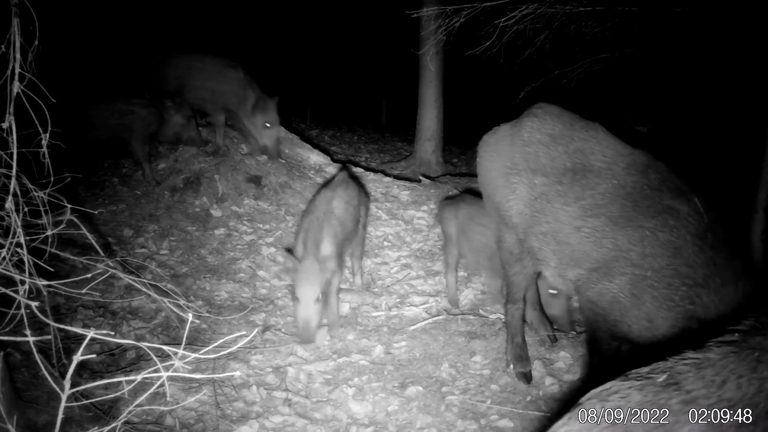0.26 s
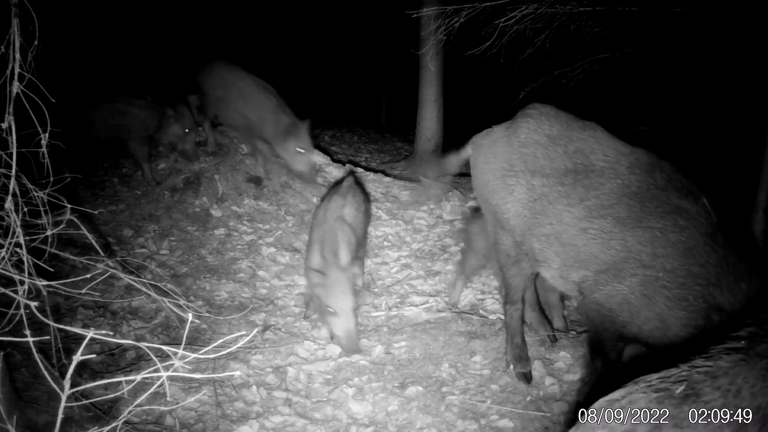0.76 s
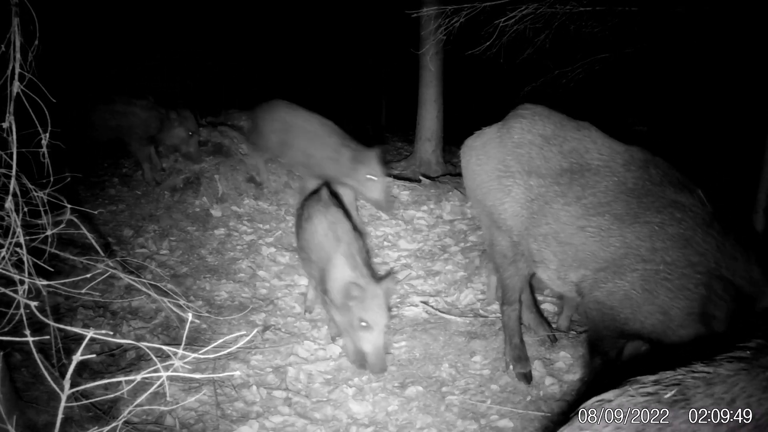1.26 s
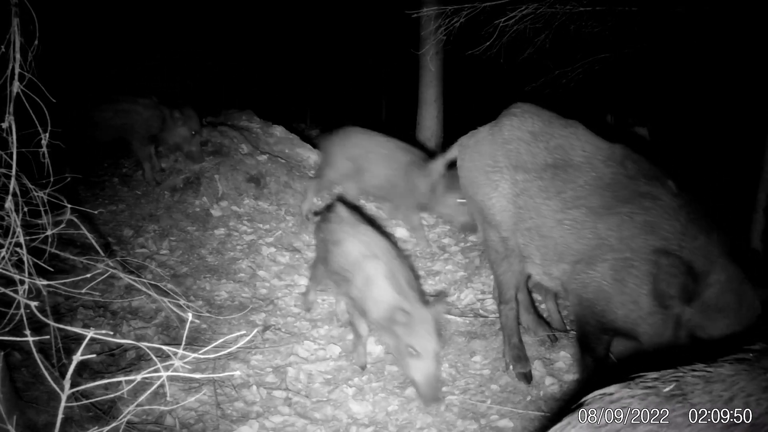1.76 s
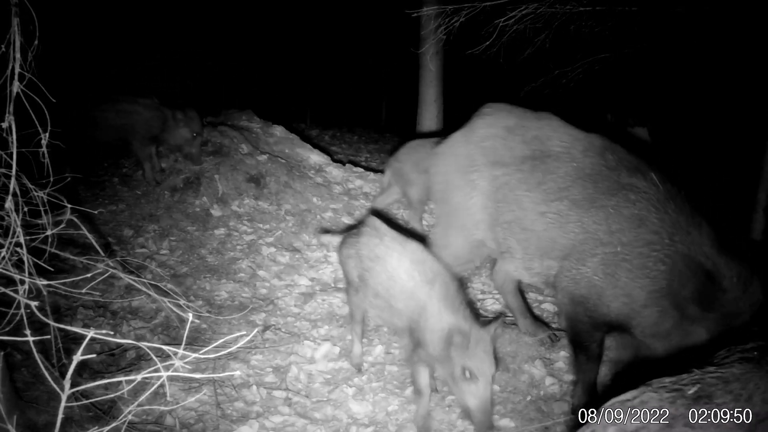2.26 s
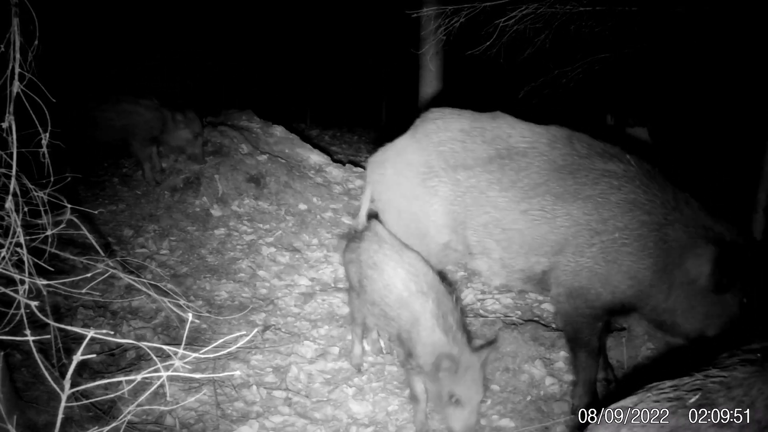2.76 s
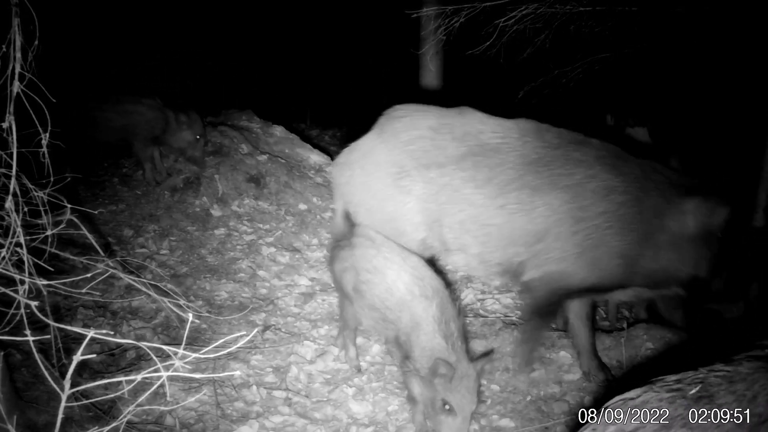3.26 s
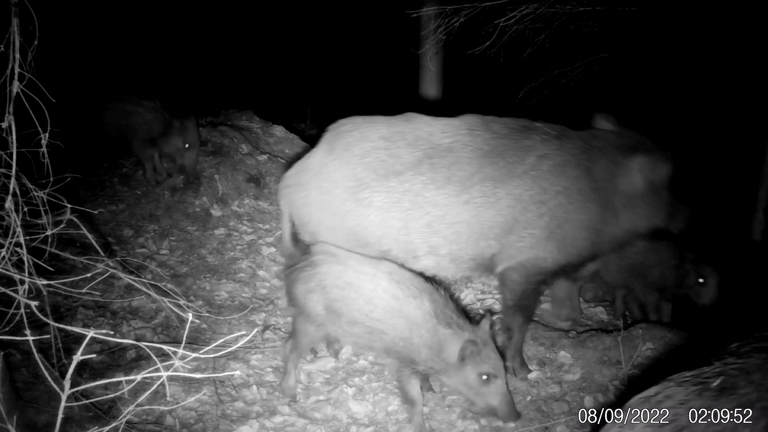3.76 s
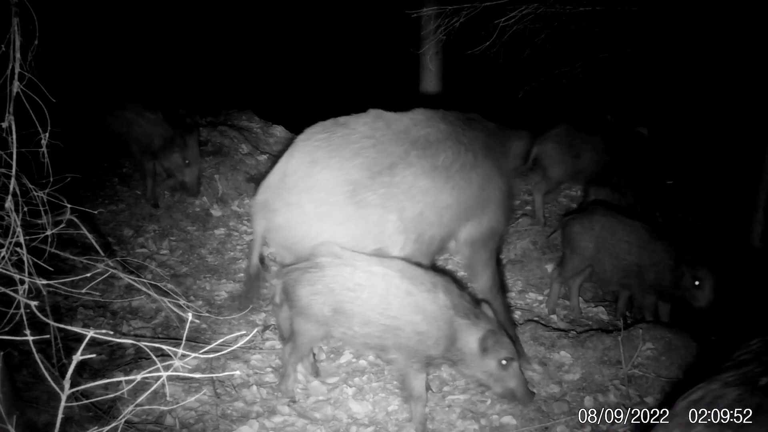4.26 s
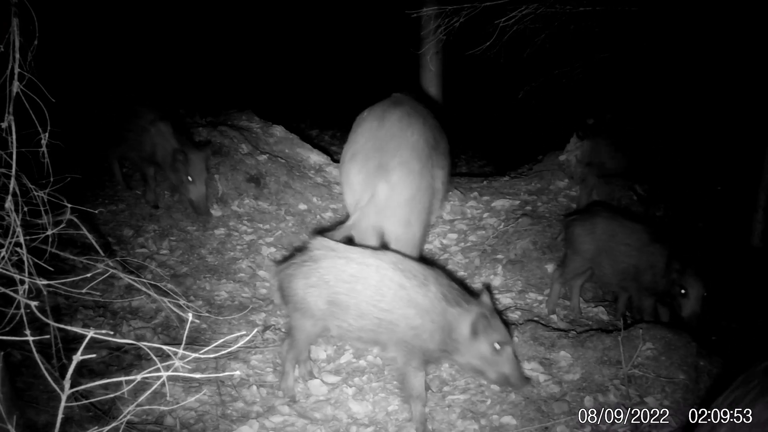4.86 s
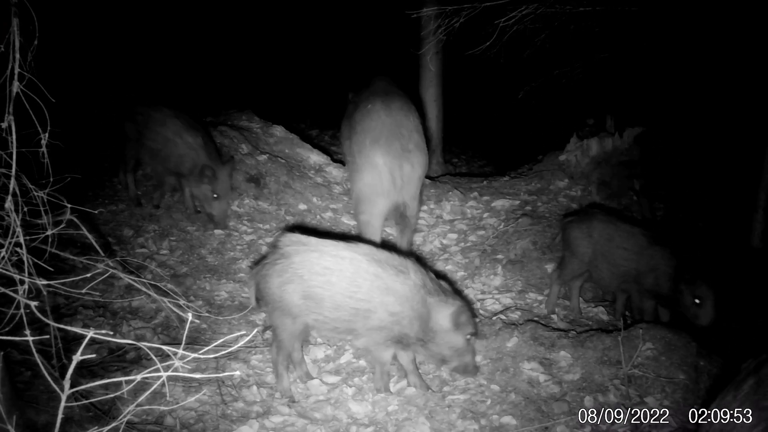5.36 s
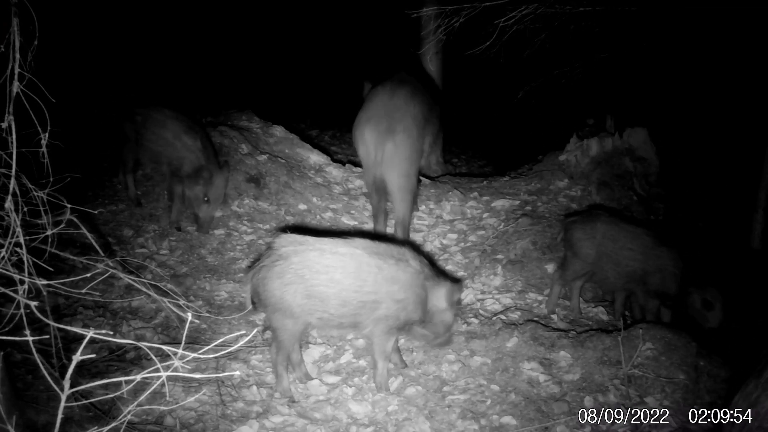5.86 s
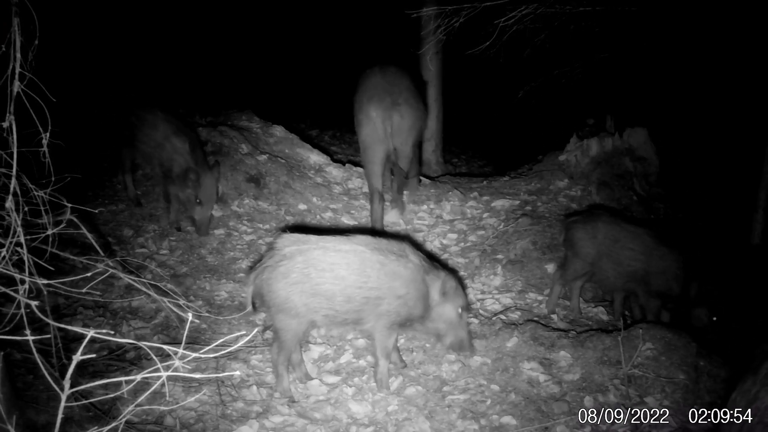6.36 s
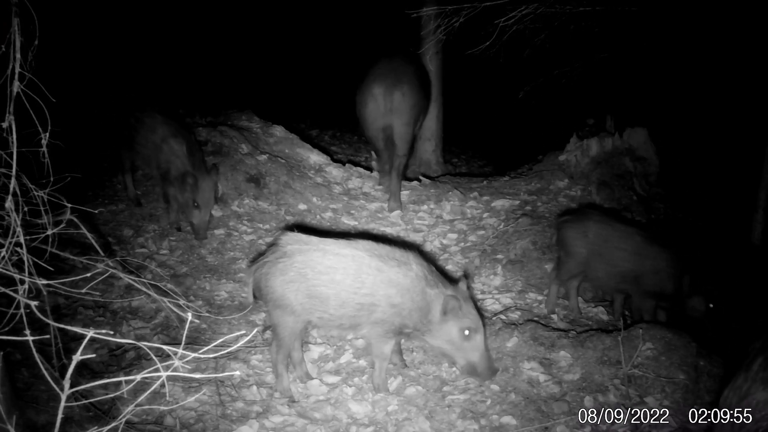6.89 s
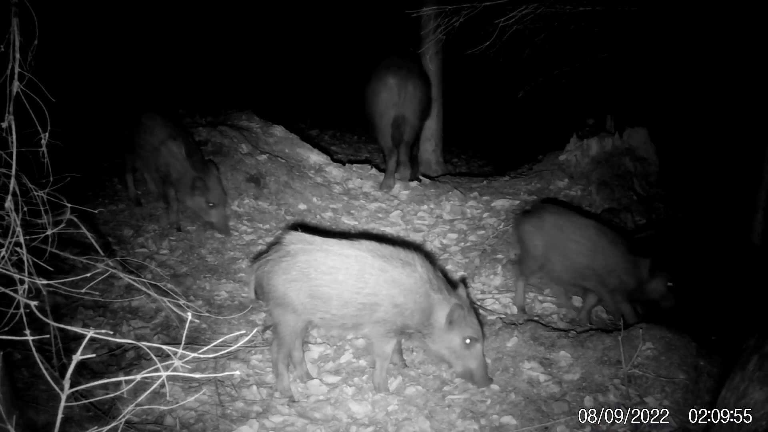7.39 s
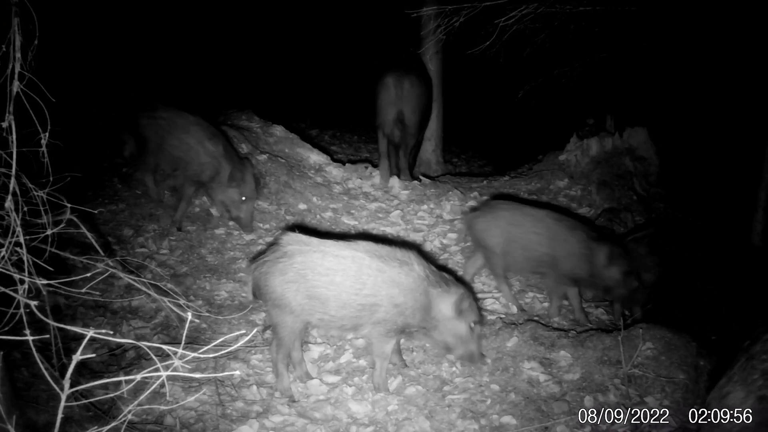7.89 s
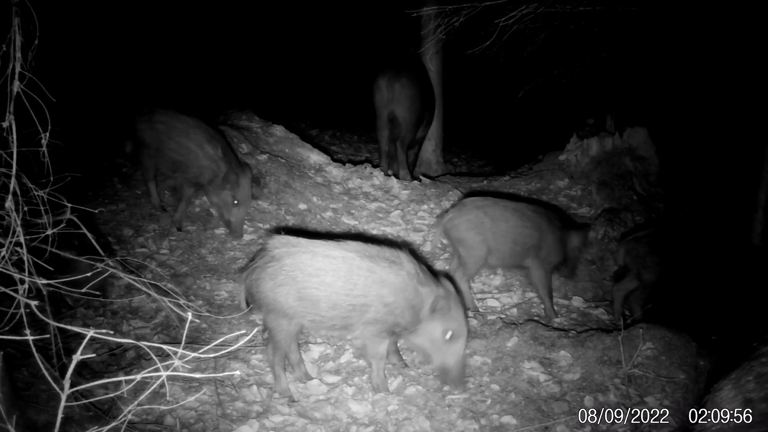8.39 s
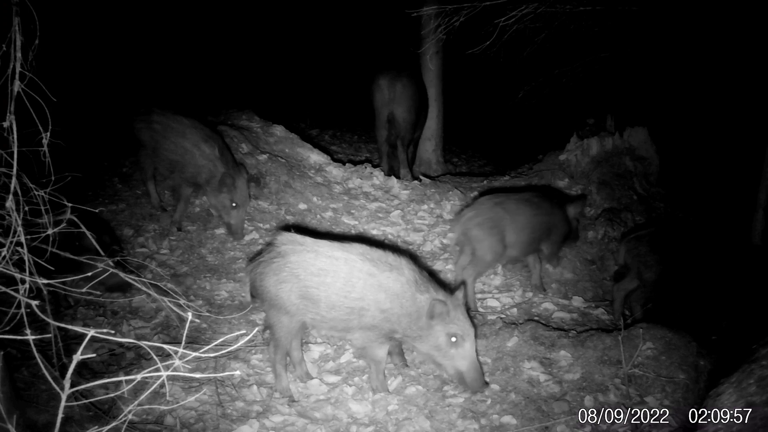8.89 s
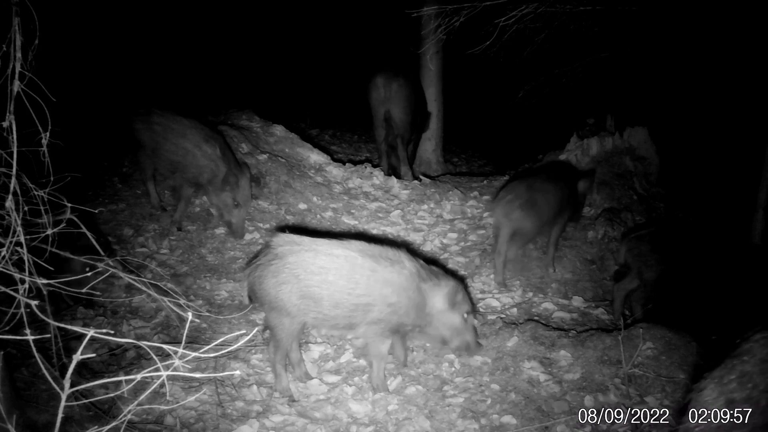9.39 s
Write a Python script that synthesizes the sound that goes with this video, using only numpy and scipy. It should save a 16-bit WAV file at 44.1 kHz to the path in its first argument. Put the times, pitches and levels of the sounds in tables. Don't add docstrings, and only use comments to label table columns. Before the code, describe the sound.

Close, hissy night woodland: low boar grunts and creaks, nasal squeaks and a snort, over constant leaf rustling, small ticks and sharp twig cracks.

```python
import sys
import numpy as np
from scipy import signal
from scipy.fft import rfft, irfft
from scipy.io import wavfile
from scipy.ndimage import uniform_filter1d

SR = 44100
rng = np.random.default_rng(int(sys.argv[2]) if len(sys.argv) > 2 else 0)


def decibels_to_gain(level_db):
    exponent = np.asarray(level_db, float) / 20
    return 10 ** exponent


def store_wav(level_fs):
    pcm = np.round(np.clip(np.atleast_2d(level_fs), -1, 1) * 32767)
    wavfile.write(sys.argv[1], SR, pcm.T.astype(np.int16))


N = 425124


def unit(x):
    return x / np.sqrt(np.mean(x ** 2))


def curve(points, at):
    hz, db = np.transpose(points)
    return decibels_to_gain(np.interp(np.log(np.maximum(at, 1)), np.log(hz), db))


def colour(x, points, lo=0, hi=SR):
    hz = np.fft.rfftfreq(N, 1 / SR)
    low_edge = 1 / np.sqrt(1 + (lo / np.maximum(hz, 1)) ** 20)
    high_edge = 1 / np.sqrt(1 + (hz / hi) ** 20)
    return unit(irfft(rfft(x) * curve(points, hz) * low_edge * high_edge, N))


def walk(rate):
    k = int(SR / rate)
    steps = np.repeat(rng.standard_normal(N // k + 1), k)
    return unit(uniform_filter1d(uniform_filter1d(steps, k), k)[:N])


def level_over_time(table):
    s, db = np.transpose(table)
    return np.interp(np.arange(N) / SR, s, db)


def add(out, s, sound):
    i = int(s * SR)
    out[i:i + len(sound)] += sound[:N - i]


def swells(rows):
    power, t = np.zeros(N), np.arange(N) / SR
    for s, db, fall_s in rows:
        distance = np.maximum(s - t, (t - s) / 1.112)
        power += decibels_to_gain(db - 10 * distance / fall_s) ** 2
    return np.sqrt(power)


def throat_pulse(throat, level_db, open_db, detune, scatter_db):
    t = np.arange(SR // 16)[:, None] / SR
    hz, db, t60 = np.transpose(throat)
    level_chance, pitch_chance = rng.standard_normal((2, len(hz)))
    opening_db = max(open_db, 0)
    treble_db = open_db * np.clip(np.log2(hz / 1400), 0, 1)
    boom_db = -0.45 * np.where(hz < 700, open_db, opening_db * (hz < 1200))
    gain = decibels_to_gain(db + treble_db + boom_db + scatter_db * level_chance)
    pitch = hz * (1 + detune * pitch_chance + 0.014 * opening_db * (hz < 2000))
    decay = decibels_to_gain(-60 * t / t60 * (1 + opening_db / 12))
    noise = rng.standard_normal((len(t), len(hz)))
    air = 1 + decibels_to_gain(-12) * uniform_filter1d(noise, size=40, axis=0) * np.sqrt(40)
    soft_start = 1 - np.exp(-t / .0004)
    ring = np.sin(2 * np.pi * pitch * t) * decay * air * soft_start
    return -decibels_to_gain(level_db + 1.5) * (gain * ring).sum(axis=1)


def grunts(table, throat, detune=.015, scatter_db=1.5):
    out = np.zeros(N)
    for first, last, count, level_db, open_db in table:
        for s in np.linspace(first, last, round(count)):
            add(out, s, throat_pulse(throat, level_db, open_db, detune, scatter_db))
    return signal.sosfilt(signal.butter(4, [130, 4600], "band", fs=SR, output="sos"), out)


def popping_sow():
    pops = [
        (.1618, .1618, 1, -46, -10),
        (.1645, .1645, 1, -34.5, -11),
        (.4275, .4275, 1, -38.5, -16),
        (1.7096, 1.7096, 1, -50, -4),
        (2.212, 2.212, 1, -39, -9),
        (2.2418, 2.2418, 1, -46, -3),
        (2.2455, 2.2455, 1, -32, 0),
    ]
    throat = [(335, -8, .035), (620, -14, .02), (1240, 0, .045), (1540, -11, .03), (1750, -15, .03),
              (2000, -16, .03), (2630, -19, .03), (3045, -17, .025), (3650, -4, .016)]
    return grunts(pops, throat)


def barking_sow():
    bark = [
        (1.3826, 1.3826, 1, -34, 0),
    ]
    bark_throat = [(271, -4, .045), (641, -13, .05), (1017, -9, .045), (1196, -5, .045), (1765, -3, .06),
                   (2269, -12, .045), (2482, -1, .04), (2737, -7, .035), (3299, -5, .035),
                   (3890, -17, .025)]
    second_bark = [
        (1.7412, 1.7412, 1, -34, 0),
    ]
    second_throat = [(275, -4, .045), (675, -8, .045), (1040, -1, .05), (1221, 0, .05), (1789, -10, .05),
                     (2472, -6, .045), (2754, -16, .035), (3305, -3, .045), (3860, -18, .025)]
    return grunts(bark, bark_throat, .004, .7) + grunts(second_bark, second_throat, .004, .7)


def creaking_sow():
    creaks = [
        (.0823, .1167, 2, -48, 13),
        (1.4976, 1.4976, 1, -38, 6),
        (1.531, 1.5974, 3, -35.5, 0),
        (1.6318, 1.6318, 1, -44, -1),
        (1.7829, 1.9266, 5, -50, 14),
    ]
    creak_throat = [(190, -7, .04), (600, -17, .02), (1140, 0, .026), (1350, -7, .015), (1510, -4, .03),
                    (1950, -10, .022), (2580, -7, .01), (3270, -4, .022), (3700, -17, .018)]
    gapes = [
        (3.6093, 3.6093, 1, -52, 4),
        (3.6815, 3.7185, 2, -57, 2),
        (4.829, 4.829, 1, -45, 6),
        (4.8637, 4.8637, 1, -40, 1),
        (4.8965, 4.9283, 2, -42, 0),
    ]
    gape_throat = [(1290, -3, .03), (1720, -6, .022), (1860, -7, .022), (2900, 0, .016), (3250, 2, .02),
                   (3650, 0, .014)]
    return grunts(creaks, creak_throat) + grunts(gapes, gape_throat, .02, 2)


def rasping_sow():
    rasps = [(1.864, 1.904, 3, -52, 3), (2.0478, 2.0997, 3, -45, -6), (2.1197, 2.1651, 4, -46, -3),
             (2.3277, 2.3901, 4, -51, 4), (2.411, 2.4729, 3, -47, -3), (2.4929, 2.535, 3, -50, -4),
             (2.381, 2.431, 2, -51, -2), (3.0655, 3.1039, 3, -61, 9), (3.515, 3.5604, 3, -61, 9),
             (4.2942, 4.2942, 1, -50, 3), (4.3561, 4.379, 2, -52, 7)]
    throat = [(290.6, 1, 0.0218), (614, 0, 0.016), (1170, 4, 0.024), (1820, -2, 0.022), (2277, 1, 0.018),
              (2800, -1, 0.018)]
    # (time [s], peak level [dB], centre frequency [Hz])
    nose_rings = [
        (2.3496, -41, 6000),
        (2.3695, -39, 6100),
        (2.3905, -33, 6150),
        (2.4112, -34, 6150),
        (2.4314, -37, 6200),
        (2.4513, -42, 6200),
        (2.4723, -35, 6200),
        (2.491, -35, 6250),
    ]
    return grunts(rasps, throat, detune=.06, scatter_db=2.5) + snaps(nose_rings, .09, -40)


def chest(creak_hz=31, depth=0.38):
    # (frequency [Hz], level [dB])
    chest_colour = [(30, -17), (70, -3), (140, -2), (280, 0), (400, -3), (600, -10), (1000, -28),
                    (4000, -48)]
    # (peak time [s], level [dB], time to fall 10 dB [s])
    rumbles = [(.12, -65, 0.4), (.43, -57.5, 0.25), (.9, -61.5, 0.1536), (1.55, -62.5, 0.1543),
               (1.9, -57, 0.14), (2.12, -60.5, 0.13), (2.25, -63, 0.06), (2.47, -56, 0.1047),
               (2.69, -63.5, 0.09), (3.05, -61, 0.19), (3.55, -64.5, 0.41), (4.42, -60.5, 0.13),
               (4.9, -66.5, 0.1), (5.85, -68, .3), (6.3, -67.5, 0.25), (8.3, -67, .25), (8.85, -63, 0.23)]
    phase = np.cumsum(creak_hz * (1 + .15 * walk(5.4))) / SR % 1
    throb = 1 - depth + depth * 3 * np.exp(-phase / 0.133)
    breath = unit(throb * colour(rng.standard_normal(N), chest_colour))
    herd = decibels_to_gain(-73)
    return decibels_to_gain(2.5) * np.hypot(swells(rumbles), herd) * breath


def slide(s, length, start_hz, end_hz):
    return [(s, start_hz), (s + .55 * length, end_hz), (s + length, end_hz)]


def glide(path, db):
    s, hz = np.transpose(path)
    t = np.arange(s[0], s[-1], 1 / SR)
    pitch = uniform_filter1d(np.interp(t, s, hz), size=SR // 100)
    phase = 2 * np.pi * np.cumsum(pitch) / SR
    flutter = decibels_to_gain(45 * uniform_filter1d(rng.standard_normal(len(t)), size=SR // 150))
    ends = np.clip(np.minimum(t - s[0], s[-1] - t) / .005, 0, 1)
    arch = decibels_to_gain(db - 4 * np.linspace(-1, 1, len(t)) ** 2)
    return s[0], phase, pitch, np.sqrt(2) * ends * flutter * arch


def whistling_snout():
    # (start [s], length [s], from pitch [Hz], to pitch [Hz], level [dB])
    slides = [
        (0.104, 0.054, 1657, 2080, -51),
        (0.268, 0.0247, 2247, 2302, -55),
        (0.459, 0.0307, 640, 790, -57),
        (0.753, 0.066, 1603, 2132, -57),
        (5.091, 0.0486, 1586, 2029, -56.5),
        (5.58, 0.0707, 1932, 2054, -64.5),
        (7.378, 0.013, 957, 931, -55),
        (8.72, 0.061, 2950, 2760, -64),
    ]
    # (third overtone [dB], level [dB], path of (time [s], pitch [Hz]))
    warbles = [
        (4, -54.5, [(.296, 1490), (.32, 1910), (.338, 2015), (.37, 1865), (.4, 1975), (.43, 1955), (.46, 1810), (.485, 2010), (.505, 2030)]),
        (7, -62, [(5.438, 1400), (5.455, 1830), (5.47, 2000), (5.49, 2020)]),
        (-20, -52, [(6.885, 1882), (6.9, 1918), (6.935, 1691), (6.965, 2037), (6.99, 2155)]),
        (-4, -58, [(7.13, 1529), (7.164, 1789), (7.225, 1490)]),
        (-2, -57, [(7.245, 1520), (7.28, 1892), (7.335, 2140), (7.36, 1720), (7.41, 1588)]),
        (-26, -62, [(7.445, 1580), (7.463, 1680), (7.535, 1476)]),
    ]
    calls = []
    for s, length, start_hz, end_hz, db in slides:
        octaves_off = np.log2(3 * end_hz / 6000)
        third_db = 2 - min(10 * (octaves_off / .2) ** 2, 20)
        calls.append((third_db, db, slide(s, length, start_hz, end_hz)))
    out = np.zeros(N)
    for third_db, db, path in calls + warbles:
        s, phase, pitch, env = glide(path, db)
        second = decibels_to_gain(-17) * np.sin(2 * phase)
        tiring_db = 3 * np.linspace(1, -1, len(env))
        third = decibels_to_gain(third_db + tiring_db) * np.sin(3 * phase)
        add(out, s, env * (np.sin(phase) + second + third))
    return out


def waver(count):
    wander = uniform_filter1d(rng.standard_normal(count), size=SR // 40)
    return decibels_to_gain(2 * np.sqrt(SR / 40) * wander)


def squeaking_snout():
    # (share of the resonance frequency [ratio], level [dB])
    squeak_colour = [(.25, -20), (.55, -13), (.7, -7), (.85, 0), (1, 4), (1.2, 1), (1.45, -8), (1.7, -12),
                     (1.95, -7), (2.15, -26), (2.6, -40)]
    # (time [s], frequency [Hz])
    nostril = [(5.7, 6100), (5.9, 5600), (6.1, 5700), (7.1, 4700), (7.3, 5200), (7.6, 4600), (8.33, 3900),
               (8.46, 4700), (9.27, 5000), (9.5, 4900)]
    # (start [s], length [s], rim pitch [Hz], turn pitch [Hz], level [dB])
    sniffs = [
        (5.695, .085, 1230, 955, -60),
        (5.93, .12, 1350, 800, -71),
        (5.98, .07, 1230, 955, -65),
        (8.33, .07, 1150, 1340, -67),
        (8.4, .045, 1180, 1215, -65),
        (8.77, .035, 1060, 1120, -64),
        (9.272, .063, 1200, 1620, -61),
        (9.33, .04, 1230, 990, -59),
        (9.455, .085, 1400, 1110, -59),
        (9.515, .058, 970, 1290, -58),
    ]
    # (start [s], length [s], from pitch [Hz], to pitch [Hz], level [dB])
    slides = [
        (5.9, .04, 950, 1250, -66),
        (9.36, .06, 1130, 1400, -64),
        (9.4, .025, 1230, 1270, -63),
    ]
    # (level [dB], path of (time [s], pitch [Hz]))
    warbles = [
        (-63, [(6.1, 1220), (6.12, 1060), (6.135, 1025), (6.155, 1090), (6.17, 1095), (6.19, 1215), (6.235, 1245)]),
        (-63, [(7.13, 1240), (7.16, 1335), (7.195, 1375), (7.215, 1650), (7.235, 1950)]),
        (-60, [(7.285, 1400), (7.32, 1265), (7.35, 1330), (7.372, 1405), (7.395, 1260), (7.415, 1050), (7.435, 1190), (7.455, 1420)]),
        (-61, [(7.44, 1290), (7.465, 1860), (7.495, 1900), (7.514, 1690)]),
        (-62, [(7.515, 1350), (7.55, 1150), (7.568, 1240), (7.62, 1240), (7.647, 1355), (7.665, 1300), (7.69, 1320)]),
        (-63, [(7.685, 1310), (7.71, 1400), (7.74, 1340), (7.795, 1065), (7.82, 1110), (7.845, 1250), (7.86, 1250)]),
        (-64, [(8.46, 1330), (8.52, 1260), (8.57, 1360), (8.63, 1240), (8.69, 1310), (8.71, 1230), (8.725, 950)]),
    ]
    calls = []
    for s, length, rim, turn, db in sniffs:
        path = [(s + length * (u + 1) / 2, turn + (rim - turn) * abs(u) ** 1.4)
                for u in np.linspace(-1, 1, num=9)]
        calls.append((db, path))
    for s, length, start_hz, end_hz, db in slides:
        calls.append((db, slide(s, length, start_hz, end_hz)))
    colour_hz = [(1000 * share, db) for share, db in squeak_colour]
    out = np.zeros(N)
    for db, path in calls + warbles:
        s, phase, pitch, env = glide(path, db)
        resonance_hz = np.interp(s, *np.transpose(nostril))
        buzz = np.zeros(len(env))
        for k in range(1, 10):
            gain = curve(colour_hz, 1000 * k * pitch / resonance_hz)
            buzz += gain * waver(len(env)) * np.sin(k * phase + k * k)
        add(out, s, env * buzz)
    return out


def snort():
    # (time [s], level [dB])
    breath = [
        (5.09, -64),
        (5.16, -46.5),
        (5.23, -40),
        (5.3, -44),
        (5.36, -48.5),
        (5.43, -64),
    ]
    # (frequency [Hz], level [dB])
    snort_colour = [(700, -16), (2000, -6.5), (3500, -8), (4800, -8.5), (6200, -3.5), (8300, 0),
                    (10500, -14.5), (12500, -25)]
    return decibels_to_gain(level_over_time(breath) + walk(27)) * colour(rng.standard_normal(N), snort_colour)


def crackle(per_s, spread_db, ring_s):
    sizes = decibels_to_gain(spread_db * np.minimum(rng.exponential(size=N), 4))
    hits = (rng.random(N) < per_s / SR) * sizes
    return unit(signal.lfilter([1], [1, -np.exp(-1 / (ring_s * SR))], hits))


def leaves():
    # (frequency [Hz], level [dB])
    leaf_colour = [(290, -35.5), (500, -1.5), (742, 5.5), (806, 4.5), (874, 3.5), (2060, 3.5), (4370, -8),
                   (5740, -0.5), (7960, -10.5), (10000, -21), (13000, -29)]
    # (time [s], level [dB])
    stirring = [(0, -59), (.7, -59), (1.2, -61.5), (1.55, -59), (2.4, -59), (2.85, -65), (4.1, -60),
                (5.2, -58), (5.6, -63), (6.3, -67.5), (7.3, -61), (8, -64.5), (9.64, -58.5)]
    # (peak time [s], level [dB], time to fall 10 dB [s],
    # crisp top [dB])
    shuffles = [(0, -50, 0.0853, -4), (.1, -48.5, 0.12, -5), (.21, -48.5, 0.14, -6), (.4, -53.5, 0.32, -8),
                (1.15, -54, 0.08, -6), (1.49, -53.5, .04, -3), (.48, -55, .02, -1), (1.88, -55.5, 0.11, -2),
                (2.12, -52.5, 0.12, -1), (2.95, -55, 0.03, -7), (3.14, -49.5, 0.1, -2),
                (3.36, -52.5, 0.06, -4), (3.46, -54.5, 0.1, -5), (3.57, -56, 0.07, -3),
                (3.89, -54, 0.08, -6.5), (4.05, -55.5, 0.18, 3), (4.45, -52.5, 0.32, 3.5),
                (4.56, -54, .03, 3), (4.68, -57, .06, -3), (4.97, -53.5, 0.28, -7),
                (5.64, -48.5, 0.07, -4.5), (5.85, -51.5, 0.073, -5), (6.18, -57.5, 0.1, -5.5),
                (6.41, -57, 0.06, -5), (6.76, -56, 0.2, -3), (7.4, -55, 0.33, -2.5), (7.64, -52.5, .04, 1),
                (7.72, -54, 0.16, -5), (8.22, -55, 0.3, -7), (8.332, -47, 0.03, -4), (8.48, -52, 0.085, -8),
                (8.76, -50.5, .08, -6), (9.005, -49, 0.09, -11), (9.182, -49.5, 0.05, 0),
                (9.29, -55, 0.06, -9),
                (5.47, -57, .1, 3),
        (7.9, -59, 0.1, 1),
        (9.49, -54, .12, 0),
    ]
    rows = shuffles
    stir = decibels_to_gain(level_over_time(stirring))
    near = swells([(s, db, fall_s) for s, db, fall_s, crisp_db in rows])
    crisp = swells([(s, db + crisp_db, fall_s) for s, db, fall_s, crisp_db in rows])
    cracks = .5 + .3 * crackle(600, 3.6, .0012) + .2 * crackle(40, 1.5, .01)
    grain = cracks * rng.standard_normal(N)
    core = decibels_to_gain(1.2 * walk(25)) * colour(grain, leaf_colour, 4000, 7100)
    top = decibels_to_gain(2.2 * walk(14) - 1.5) * colour(grain, leaf_colour, 7300)
    smoother = grain + .7 * rng.standard_normal(N)
    body = decibels_to_gain(-1.5) * colour(smoother, leaf_colour, 450, 4000)
    core_level = np.hypot(stir, near)
    top_level = np.hypot(decibels_to_gain(-20) * stir, crisp)
    body_level = np.hypot(decibels_to_gain(-1.5) * stir, decibels_to_gain(-8.5) * near)
    return decibels_to_gain(-2.0) * (core_level * core + top_level * top + body_level * body)


def snaps(table, width, body_db):
    out, t = np.zeros(N), np.arange(SR // 16) / SR
    hz = np.fft.rfftfreq(len(t), 1 / SR)
    dull = 1 / (1 + 1j * (hz / 2400 - 2400 / (hz + 1)) / 0.79) ** 2
    soft_top = (1 + 1j * hz / 10500 - (hz / 9500) ** 2) ** 3
    envelope = np.exp(-t / .00075) + decibels_to_gain(-20) * np.exp(-t / .011)
    for s, db, centre in table:
        burst = (rng.standard_normal(len(t)) + 3.3 * (t == 0)) * envelope
        ring = 1 / (1 + 1j * (hz / centre - centre / (hz + 1)) / width) ** 2
        body = decibels_to_gain(body_db) * min(centre / 2400, 1) ** 2 * dull
        snap = irfft(rfft(burst) * (ring + body) / soft_top, len(t))
        add(out, s, decibels_to_gain(db - 1.0) * snap / np.abs(snap).max())
    return out


def twigs():
    twig_snaps = [(4.8884, -33.5, 4790), (5.271, -27, 7800), (2.2777, -35, 5300), (6.596, -32, 5370),
                  (6.6237, -30.5, 5240), (6.691, -25, 6900), (7.2475, -35, 5440), (7.2741, -26.5, 7300),
                  (7.5504, -29, 4780), (7.796, -33, 5040), (8.111, -30.5, 5650), (8.3182, -14.5, 5430),
                  (8.3195, -14.5, 4350), (8.3186, -26, 2500), (8.3189, -24, 3400), (8.3192, -37, 1350),
                  (7.5506, -38.5, 2700), (8.8497, -37.5, 2000), (.1175, -34, 3400), (.2872, -42, 700),
                  (.3148, -36, 1200), (.315, -41, 550), (.3488, -39, 1200), (.349, -44, 550),
                  (.4275, -37, 2900), (.525, -44, 2400), (.938, -45, 1000), (.948, -45, 2150),
                  (3.6452, -41, 3600), (4.553, -41, 1500), (9.26, -44, 2700), (8.5568, -21, 5500),
                  (8.8407, -31, 4670), (8.8495, -34, 4300), (9.1637, -19.5, 4890), (9.1652, -23, 4700),
                  (9.1662, -25, 6200), (9.1677, -25, 4400), (9.1686, -31, 2920), (9.17, -46, 890)]
    return snaps(twig_snaps, 0.44, -12.5)


def stalks():
    ticks = [(0.0767, -35, 6050), (0.1133, -26, 6160), (0.1943, -28.5, 7700), (0.2019, -28.5, 5730),
             (0.5756, -41, 5500), (0.6634, -38.5, 5820), (1.0924, -43, 5570), (1.1248, -36.5, 5780),
             (1.3394, -43, 6390), (1.3618, -37, 6440), (1.4421, -38, 5510), (1.4845, -36, 4900),
             (1.5574, -42, 5880), (1.6906, -38, 6290), (1.8632, -36, 5700), (1.8826, -34, 5700),
             (2.0792, -33, 7100), (2.0996, -37, 6310), (2.128, -34, 5730), (2.5122, -43, 8000),
             (2.945, -42, 8800), (2.807, -39.5, 5420), (2.9143, -43, 5850), (3.141, -27.5, 5730),
             (3.3275, -30, 5400), (3.4164, -29, 6220), (3.434, -34, 5490), (3.5748, -39, 6670),
             (3.684, -34, 5600), (3.8342, -43, 5830), (3.8935, -37, 5540), (3.9838, -37, 5230),
             (4.1016, -30.5, 6600), (4.121, -34, 5640), (4.252, -38, 5530), (4.2936, -35, 5670),
             (4.374, -35, 5450), (4.5027, -34, 6520), (4.555, -31, 5950), (4.6299, -36.5, 5680),
             (4.9127, -30, 6240),
             (5.6082, -34, 5590), (5.6481, -31.5, 5240), (5.7728, -44, 6020), (5.8366, -38, 5260),
                  (6.2741, -41, 6890), (6.3515, -44, 5640), (6.3989, -40, 5780), (6.5077, -36, 5000),
                  (6.543, -38.5, 5850), (6.57, -40, 5530), (6.7136, -41, 5430), (6.7401, -34, 5610),
                  (6.794, -37, 5720), (7.0748, -45, 5490), (7.1272, -43, 5490), (7.4694, -42, 5680),
                  (7.6316, -37, 6610), (7.6464, -36, 5360), (7.7394, -37, 5790), (7.857, -37, 5520),
                  (7.9369, -40, 4970), (7.9594, -43, 6090), (8.074, -38, 5280), (8.4522, -42, 6410),
                  (8.4731, -38, 5470), (8.4964, -39, 5450), (8.7347, -36, 5540), (8.7514, -38, 5400),
                  (8.9835, -39, 5480), (9.0034, -35, 5740), (9.0962, -43, 5270)]
    crisps = [(0.1945, -37, 7690), (0.4733, -47, 7540), (0.6634, -46, 7460), (1.4421, -48, 7700),
              (2.0792, -40, 7780), (2.1276, -41, 7510), (2.807, -49, 7410), (3.1413, -38, 8070),
              (3.4161, -44, 7640), (4.1016, -41, 7850), (4.1854, -43, 8070), (4.374, -35, 8170),
              (4.777, -48, 7580), (5.1746, -35, 8070), (5.218, -33, 8170), (5.2709, -31, 8110),
              (6.5076, -46, 8040), (6.6912, -35, 9500), (7.2739, -32, 8560), (7.6316, -37, 9290),
              (8.3185, -28, 7710), (8.5565, -44, 7470), (8.7345, -45, 8230), (9.1641, -36, 9350)]
    edges = [(s, db - 3, centre) for s, db, centre in crisps if db < -33]
    return snaps(ticks + edges, 0.22, -24)


def hiss():
    # (frequency [Hz], level [dB])
    hiss_colour = [(12, -43.5), (20, -1.5), (238, -4.5), (580, 0), (1340, 2), (2910, -8.5), (3740, -10.5),
                   (5680, -3.5), (7940, -35), (10200, -32), (12100, -30.5), (15500, -30)]
    return decibels_to_gain(-61) * colour(rng.standard_normal(N), hiss_colour)


def dropout(heard):
    into_gap = (np.arange(N) / SR - 9.5705) / .016
    gate = np.clip(np.abs(2 * into_gap - 1) * 8 - 7, .03, 1)
    restart = (into_gap > 1) * np.exp(-np.abs(into_gap) / 6)
    return heard * gate + .001 * restart


def scene():
    voices = popping_sow() + barking_sow() + creaking_sow() + rasping_sow() + chest()
    noses = whistling_snout() + squeaking_snout() + snort()
    litter = leaves() + twigs() + stalks()
    return np.tile(voices + noses + litter, (2, 1))


def low_pass(x):
    return signal.sosfilt(signal.butter(12, 15630, fs=SR, output="sos"), x)


def record(dry):
    heard = signal.sosfilt(signal.butter(8, 10500, fs=SR, output="sos"), dry)
    mix = dropout(heard + hiss())
    return low_pass(mix)


dry = scene()
out = record(dry)
store_wav(out)
```